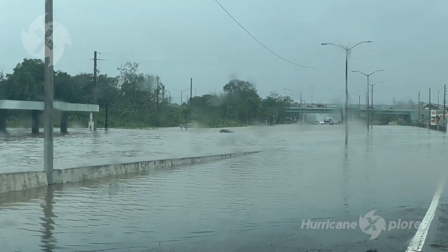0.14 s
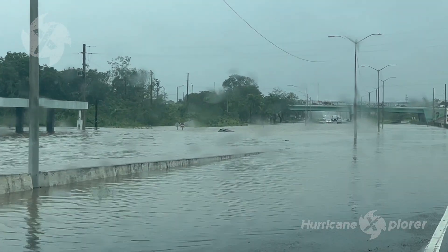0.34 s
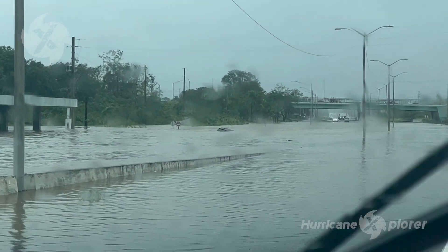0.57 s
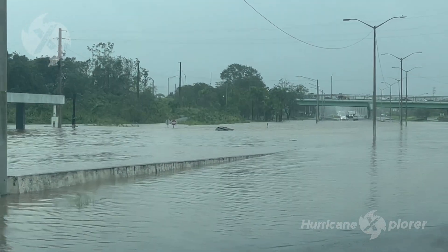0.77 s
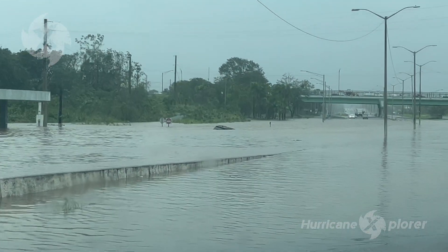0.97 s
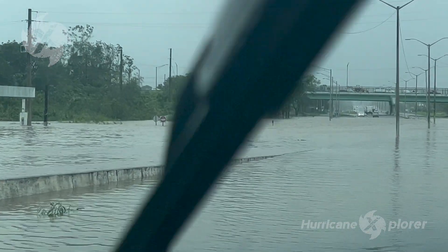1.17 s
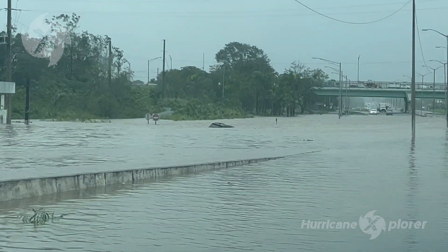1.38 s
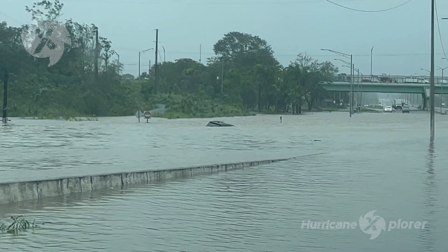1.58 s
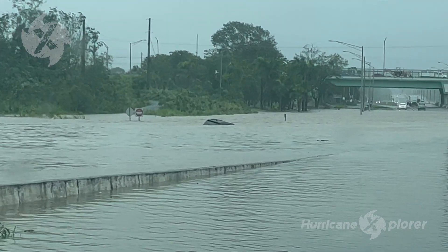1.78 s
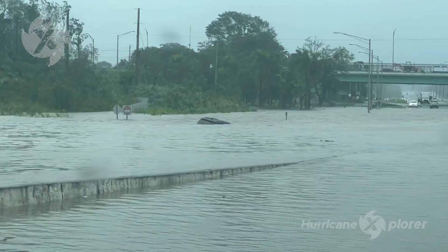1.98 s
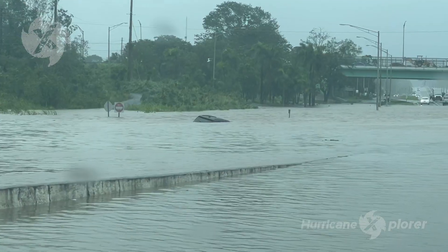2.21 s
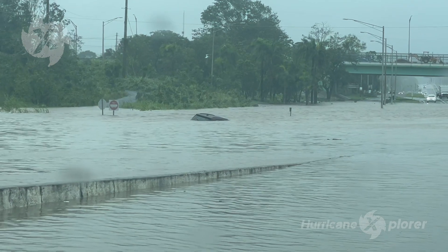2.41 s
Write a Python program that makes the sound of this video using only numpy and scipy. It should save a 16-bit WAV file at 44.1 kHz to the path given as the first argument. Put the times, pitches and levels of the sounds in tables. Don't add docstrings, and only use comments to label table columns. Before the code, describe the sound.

A windscreen wiper judders, thumps and scrapes across glass inside a slowly rolling car in rain.

```python
import sys
import numpy as np
from scipy import signal
from scipy.fft import rfft, irfft
from scipy.io import wavfile
from scipy.ndimage import uniform_filter1d

SR = 44100
rng = np.random.default_rng(int(sys.argv[2]) if len(sys.argv) > 2 else 0)


def generate_wav(signal):
    frames = np.transpose(np.atleast_2d(signal))
    scaled = np.clip(frames, -1, 1) * 32767
    pcm = np.round(scaled).astype(np.int16)
    wavfile.write(sys.argv[1], SR, pcm)


def ratio_of_db(decibels):
    return 10 ** (np.asarray(decibels, float) / 20)


N = 108045
TIME_S = np.arange(N) / SR
BINS_HZ = np.fft.rfftfreq(N, 1 / SR)


def evened(x):
    return x / np.sqrt(np.mean(x ** 2) + 1e-20)


def read(points, hz):
    point_hz, value = np.transpose(points)
    return np.interp(np.log(hz + 1), np.log(point_hz + 1), value)


def follow(curve):
    return np.interp(TIME_S, *np.transpose(curve))


def add(mix, start_s, sound):
    part = mix[round(start_s * SR):][:len(sound)]
    part += sound[:len(part)]


def resonate(x, hz, width_hz):
    turn = np.exp(2j * np.pi * hz * np.arange(len(x)) / SR)
    decay = np.exp(-np.pi * abs(width_hz) / SR)
    for _ in range(2):
        x = 2 * (turn * signal.lfilter([1 - decay], [1, -decay], x / turn)).real
    return x


def clicks(per_s, spread_db):
    chance, direction, size = rng.random((N, 3)).T
    height = ratio_of_db(spread_db * np.minimum(-np.log(size + 1e-9), 4))
    return (chance < per_s / SR) * np.sign(direction - .5) * height


# time_s, effort_db
DRAG = [(0, -72), (.1, -49.5), (.14, -36.5), (.22, -34), (.45, -38), (.6, -30.5), (.63, -29.5), (.655, -20),
        (.79, -20), (.84, -31), (.87, -40), (.905, -39), (.93, -24), (.99, -43), (1.15, -41.5),
        (1.2, -47.5), (1.5, -42.5), (1.63, -50.5)]
# pitch_hz, width_hz, level_db
CABIN = [
    (130.2, 9.3, 3),
    (156.5, 18, 6),
    (231.5, 19.2, -0.5),
    (295.5, 25, -5),
    (350.6, 16, -6.5),
    (400, 39, -23.5),
    (601, 29, -20),
    (811, 110, -19),
]


def judder():
    effort_db = follow(DRAG) - 60 * np.maximum(TIME_S - DRAG[-1][0], 0)
    pushes = clicks(per_s=770, spread_db=3.0)
    pushes = signal.oaconvolve(pushes, np.hanning(60), "same")
    rings = [ratio_of_db(db) * evened(resonate(pushes, hz, 1.67 * width_hz)) for hz, width_hz, db in CABIN]
    lower = sum(rings[:4]) / 1.135
    upper_db = 0.14 * np.minimum(follow(SCRAPE) + 44, 0) - 1.0
    return ratio_of_db(effort_db - 5) * (lower + ratio_of_db(upper_db) * sum(rings[4:]))


# time_s, level_db
SCRAPE = [
    (.44, -82),
    (.62, -67.5),
    (.645, -42.5),
    (.67, -49),
    (.71, -37),
    (.745, -44),
    (.785, -36.5),
    (.805, -72),
    (1.0, -65),
]
# pitch_hz, level_db
SCRAPE_COLOUR = [(300, -6.5), (600, 7), (1400, -2), (2500, -17.5), (8000, -29), (14000, -30.5)]


def scrape():
    chatter_per_s, noise_between = 125, 0.8
    wander = .35 * evened(uniform_filter1d(rng.standard_normal(N), size=400))
    turns = np.cumsum(1 + wander) * chatter_per_s / SR
    gate = noise_between + (.5 + .5 * np.cos(2 * np.pi * turns)) ** 4
    roughness_db = 2 * evened(uniform_filter1d(rng.standard_normal(N), size=300))
    grit = ratio_of_db(roughness_db) * gate * rng.standard_normal(N)
    grit = grit * ratio_of_db(-150 * np.maximum(TIME_S - SCRAPE[-1][0], 0))
    coloured = irfft(rfft(grit) * ratio_of_db(read(SCRAPE_COLOUR, BINS_HZ)), N)
    return ratio_of_db(follow(SCRAPE)) * evened(coloured)


def knocks(rows, rise_s, fade_s, partner_db, rough):
    out, t = np.zeros(N), np.arange(SR // 5) / SR
    rise = np.sin(np.pi / 2 * np.minimum(t / rise_s, 1)) ** 2
    shape = rise * ratio_of_db(-60 * np.maximum(t - rise_s, 0) / fade_s)
    for start_s, db, hz, second_hz in rows:
        puff = evened(resonate(rng.standard_normal(len(t)), hz, .55 * hz))
        ring = np.sin(2 * np.pi * hz * t) + ratio_of_db(partner_db) * np.sin(2 * np.pi * second_hz * t)
        add(out, max(start_s - rise_s / 2, 0), ratio_of_db(db) * shape * (ring + rough * puff))
    return out


# start_s, peak_db, pitch_hz, second_ring_hz
THUMPS = [(0.134, -29.5, 141, 268.5), (0.189, -29, 162, 201), (0.217, -19.5, 125, 237),
          (0.256, -24.5, 124.7, 269), (0.482, -26, 294.6, 136), (0.495, -29, 278, 165),
          (0.525, -30, 200, 292), (0.585, -18.5, 126, 248), (0.612, -27, 145, 341),
          (0.641, -15.5, 120, 354), (0.7195, -7, 131, 249.5), (0.742, -18.5, 247, 328),
          (0.757, -14, 150, 275), (0.763, -10, 126.7, 243.4), (0.778, -17, 116.6, 277),
          (0.808, -16, 117, 236), (0.82, -20, 124, 256), (0.845, -30.5, 121.5, 217), (0.912, -19, 205, 332),
          (0.9225, -9, 163, 245.3), (0.939, -11.5, 123.5, 282.5), (0.965, -19, 149, 218),
          (1.0, -18.5, 132, 194), (1.074, -22.5, 92.7, 197), (1.139, -30, 123, 212.6),
          (1.262, -29, 112, 198), (1.345, -29.5, 146, 261), (1.36, -33, 272.6, 140), (1.515, -35, 230, 132),
          (1.538, -26.5, 195, 281), (1.555, -28.5, 268, 155)]


def thumps():
    return knocks(THUMPS, rise_s=0.00689, fade_s=0.066, partner_db=-5, rough=0.22)


# start_s, peak_db, pitch_hz, upper_ring_hz
SLIPS = [(0.183, -45, 480, 796), (0.202, -35, 397, 790), (0.211, -41.5, 644, 1080), (0.236, -44, 489, 697),
         (0.477, -39.5, 596, 960), (0.49, -33, 393, 706), (0.529, -43.5, 608, 1073),
         (0.553, -42.5, 580, 1000), (0.57, -33.5, 615, 833), (0.638, -22.5, 556, 1114),
         (0.651, -23, 375.5, 1027), (0.66, -33, 635, 944), (0.672, -22.5, 443, 800),
         (0.682, -29.5, 590, 910), (0.691, -36, 686, 1005), (0.698, -27, 576, 1014),
         (0.715, -33.5, 645, 900), (0.725, -30, 574, 830), (0.736, -22.5, 470, 1004),
         (0.748, -34.5, 623, 880), (0.756, -37, 553, 800), (0.767, -22.5, 385, 1094),
         (0.779, -28, 596, 1365), (0.781, -38.5, 1290, 1730), (0.906, -37.5, 397, 1210),
         (1.539, -47, 556, 1013), (1.95, -48, 548, 960), (2.44, -49, 454, 955)]


def slips():
    return knocks(SLIPS, rise_s=0.014, fade_s=0.032, partner_db=-19, rough=0.64)


# time_s, peak_db
GROAN = [
    (.63, -49),
    (.645, -30),
    (.68, -9.5),
    (.704, -8.5),
    (.712, -6),
    (.725, -45.5),
]


def groan():
    pitch_hz = 161.5
    turn = 2 * np.pi * pitch_hz * TIME_S
    on = (TIME_S > GROAN[0][0]) & (TIME_S < GROAN[-1][0])
    return on * ratio_of_db(follow(GROAN)) * (np.sin(turn) + ratio_of_db(-16) * np.sin(2 * turn))


# start_s, peak_db, tilt_db_per_octave
TICKS = [(0.4583, -37.5, -5), (0.4817, -40, -5), (0.5724, -35, -12), (0.641, -44, 0.5), (0.649, -32, -5),
         (0.6565, -33.5, -4), (0.6745, -33.5, -3), (0.685, -39.5, -5.5), (0.6975, -39, -3), (0.7, -25, -9),
         (0.7057, -30, -9), (0.7125, -21, -5.5), (0.722, -28.5, -2.5), (0.73, -38, -8), (0.737, -37.5, -3),
         (0.7516, -27, -10), (0.7685, -31.5, 4.5), (0.7765, -40, -2.5), (0.78, -27.5, -9),
         (0.782, -29, -3.5), (0.7905, -40.5, 2.5), (0.7945, -42, -15.5), (0.8746, -43.5, -7.5),
         (0.9008, -43.5, -1), (0.9128, -36.5, -6.5), (1.0197, -41.5, -6.5), (1.1188, -40, -4.5),
         (1.1348, -40, -0.5), (1.2043, -45, 1), (1.2452, -42, -1), (1.295, -45, -7.5),
         (1.3823, -44.5, -4.5), (1.4307, -39.5, -2.5), (1.5368, -41.5, -6.5), (1.5628, -42.5, -2.5),
         (1.599, -42.5, -1.5), (1.7514, -44.5, -5.5), (1.9493, -41, -5.5), (2.0875, -56.5, -10),
         (2.2546, -49.5, -7.5), (2.4388, -40, -3.5)]


def ticks():
    out, size = np.zeros(N), 4096
    t = np.arange(-1024, 3072) / SR - .0015
    hz = np.fft.rfftfreq(size, 1 / SR)
    edge_db = read([(500, -60.5), (1300, 1), (7500, -2.5), (16000, -9.5)], hz)
    halo = ratio_of_db(-13.5 - 60 * abs(t) / np.where(t > 0, .09, .05))
    for start_s, db, tilt_db in TICKS:
        early = start_s < .8
        burst_s = .0005 if early else .0022
        shape = np.exp(-(t / burst_s) ** 2) + halo
        snap = 5.8 * early * (abs(t) < .5 / SR)
        tick = rng.standard_normal(len(t)) * shape + snap
        colour = ratio_of_db(edge_db + np.clip(tilt_db, -10, 3) * np.log2((hz + 300) / 4000))
        add(out, start_s - 1024 / SR, ratio_of_db(db - 7.5) * irfft(rfft(tick) * colour, size))
    return out


# start_s, level_db, pitch_hz, length_s
DRIPS = [
    (.022, -54, 2200, .028),
    (.972, -54, 1580, .024),
]


def drips():
    out = np.zeros(N)
    for start_s, db, hz, length_s in DRIPS:
        t = np.arange(0, length_s, 1 / SR)
        swell = np.sin(np.pi * t / length_s) ** 2
        add(out, start_s, ratio_of_db(db) * swell * np.sin(2 * np.pi * hz * t))
    return out


# start_s, level_db, pitch_hz, length_s
SPITS = [
    (0.541, -65, 7330, 0.064),
    (0.925, -61.5, 4450, .045),
]


def spits():
    out = np.zeros(N)
    for start_s, db, hz, length_s in SPITS:
        t = np.arange(0, length_s, 1 / SR)
        hiss = resonate(rng.standard_normal(len(t)), hz, 0.39 * hz)
        add(out, start_s, ratio_of_db(db) * np.sin(np.pi * t / length_s) * evened(hiss))
    return out


# pitch_hz, phase_radians
BLADE_TURN = [(100, 1.2), (300, 1.6), (1000, .1), (2400, 1.5)]
# pitch_hz, level_db
BLADE_SIDE = [(60, -29.5), (130, -16), (290, -11), (640, -4), (1400, 0), (2300, -14), (7900, -22),
              (8600, -1.5)]


def ports(x):
    scatter_db, scatter_s = 0.5, .07
    t = np.arange(3000) / SR
    tail = rng.standard_normal(len(t)) * ratio_of_db(-60 * t / scatter_s)
    direct = np.exp(1j * read(BLADE_TURN, BINS_HZ))
    path = direct + ratio_of_db(scatter_db) * rfft(tail / np.linalg.norm(tail), N)
    side = irfft(rfft(x) * ratio_of_db(read(BLADE_SIDE, BINS_HZ) - 4.8) * path, N)
    return np.array([x + side, x - side])


# pitch_hz, level_db, width_hz, side_share
HUM = [
    (68.1, -43, 3.9, 0.043),
    (45.5, -40, 20, 0.036),
    (215, -48.5, 15, 0.31),
    (541.4, -60.5, 13, 1.6),
]
# time_s, level_db
HEAVE = [(0, -42), (.2, -37.5), (.3, -28), (.5, -27), (.62, -37.5), (.8, -35), (.84, -24), (.89, -48.5),
         (.93, -23.5), (1.15, -33), (1.2, -41.5), (1.78, -43), (1.83, -36.5), (2.45, -47)]


def engine():
    noise, out = rng.standard_normal((len(HUM) + 1, 2, N)), 0
    for pair, (hz, db, width_hz, share) in zip(noise, HUM):
        mid, side = [evened(resonate(n, hz, width_hz)) for n in pair]
        out = out + ratio_of_db(db) * np.array([mid + share * side, mid - share * side])
    boom = resonate(noise[-1, 0], hz=61, width_hz=51)
    return out + ratio_of_db(follow(HEAVE) + 1) * evened(boom)


# pitch_hz, level_db
WASH = [(22, -50.5), (60, -6.5), (270, -18.5), (340, -27), (900, -37.5), (1700, -39.5), (4000, -46.5),
        (9000, -56)]
# pitch_hz, side_level_db
WASH_SIDE = [(60, -23.5), (290, -8.5), (640, 0.5), (1400, -4.5), (2250, -7), (2600, -16), (7900, -35),
             (8600, -3.5)]


def wash():
    frames, hz = N // 128 + 5, np.fft.rfftfreq(512, 1 / SR)
    a, b, c, d, patches = rng.standard_normal((frames, 257, 5)).T
    patches = uniform_filter1d(patches, size=6, axis=0)
    patches = evened(uniform_filter1d(patches, size=12, axis=1))
    flicker = evened(uniform_filter1d(rng.standard_normal(frames), size=5))
    flicker = flicker * np.clip(hz / 2500, 0, 1)[:, None]
    spectra = np.array([a + 1j * b, c + 1j * d]) * ratio_of_db(1.3 * patches + .6 * flicker)
    mid, side = signal.istft(spectra, nperseg=512, noverlap=384)[1][:, :N]
    colour_db = read(WASH, BINS_HZ)
    mid = rfft(mid) * ratio_of_db(colour_db)
    side = rfft(side) * ratio_of_db(colour_db + read(WASH_SIDE, BINS_HZ))
    return ratio_of_db(-39 - 3.0) * evened(irfft(np.array([mid + side, mid - side]), N))


def scene():
    blade = judder() + scrape() + slips()
    arm = thumps() + groan()
    water = ticks() + drips() + spits()
    return ports(blade + arm + water) + engine() + wash()


def top_cut(x):
    return signal.sosfilt(signal.butter(12, 16720, fs=SR, output="sos"), x)


# pitch_hz, level_db
MIC = [(8200, -0.5), (9600, -9), (9900, -36), (10500, -36), (11200, -12), (13200, -21), (13500, -40),
       (14400, -44), (14700, -24)]


def record(dry):
    top_hz, bass_cut_hz, whine_hz, whine_db = 15750, 41, 15680, -97
    wide = np.pad(dry, ((0, 0), (4096, 4096)), "reflect")
    hz = np.fft.rfftfreq(wide.shape[1], 1 / SR)
    bass_cut = hz ** 3 / (hz ** 3 + bass_cut_hz ** 3)
    colour = ratio_of_db(read(MIC, hz)) * (hz < top_hz) * bass_cut
    heard = irfft(rfft(wide) * colour, wide.shape[1])[:, 4096:4096 + N]
    whine = ratio_of_db(whine_db) * np.sin(2 * np.pi * whine_hz * TIME_S)
    return top_cut(heard + whine)


dry = scene()
out = record(dry)
generate_wav(out)
```